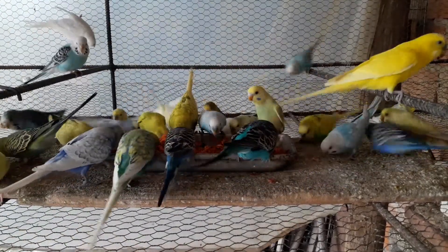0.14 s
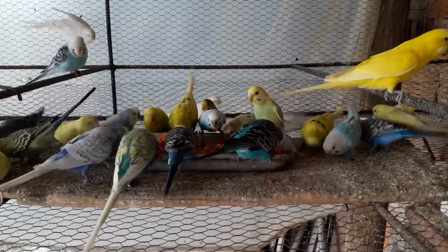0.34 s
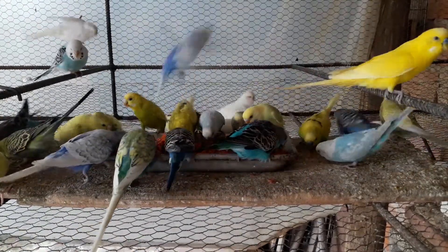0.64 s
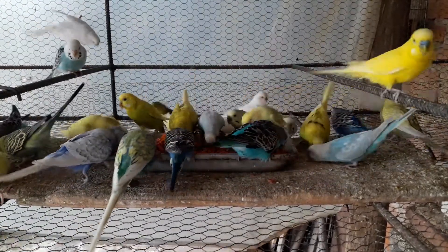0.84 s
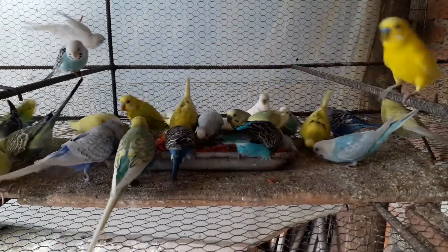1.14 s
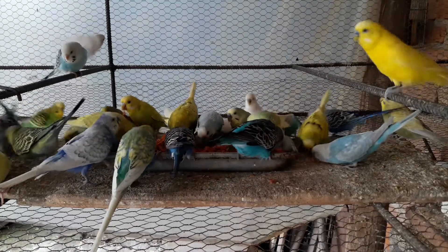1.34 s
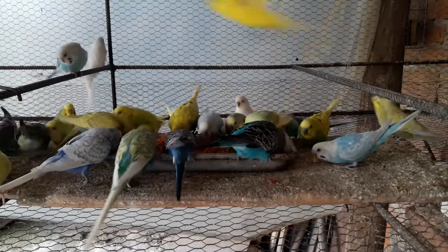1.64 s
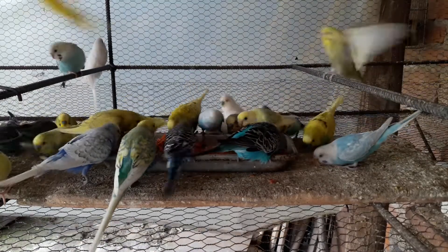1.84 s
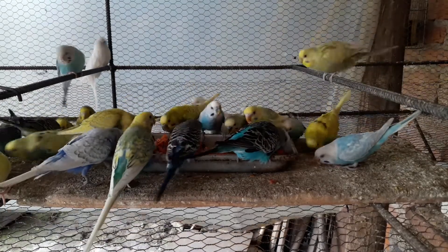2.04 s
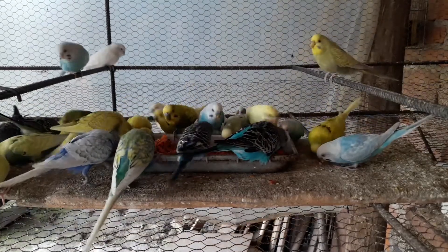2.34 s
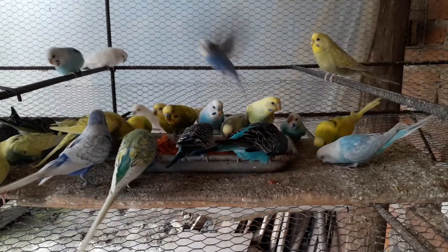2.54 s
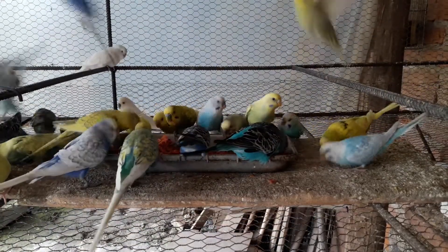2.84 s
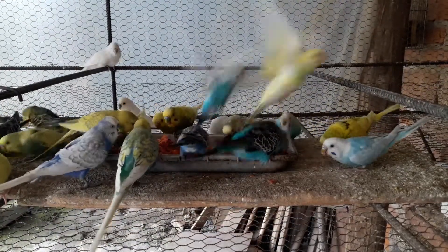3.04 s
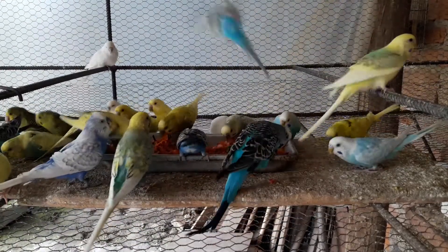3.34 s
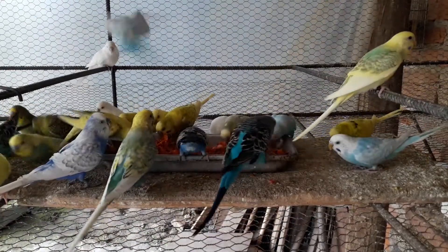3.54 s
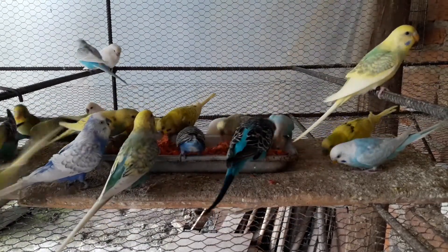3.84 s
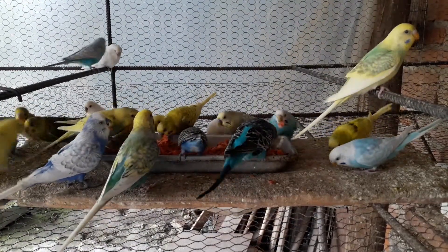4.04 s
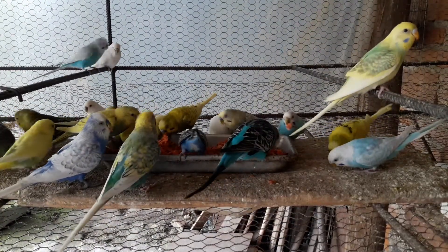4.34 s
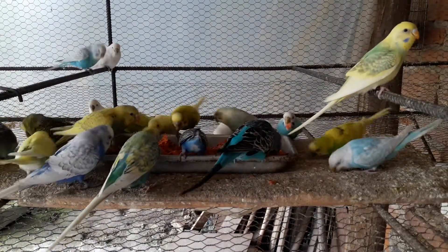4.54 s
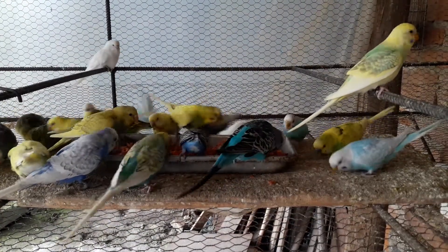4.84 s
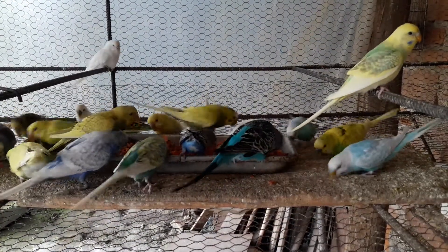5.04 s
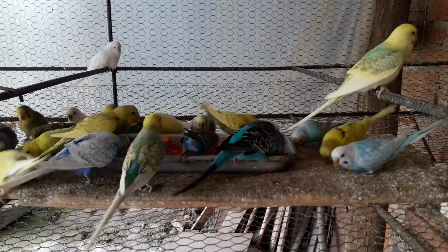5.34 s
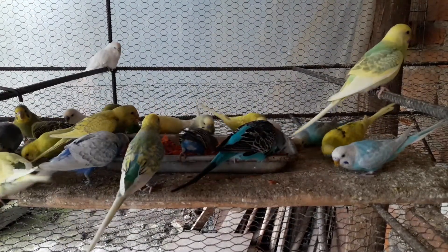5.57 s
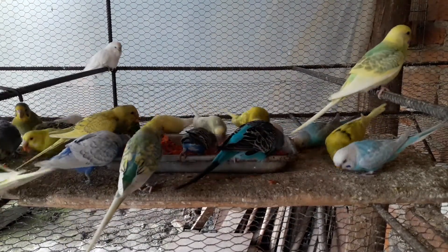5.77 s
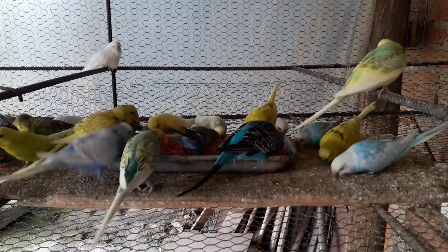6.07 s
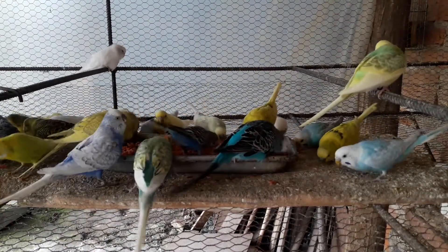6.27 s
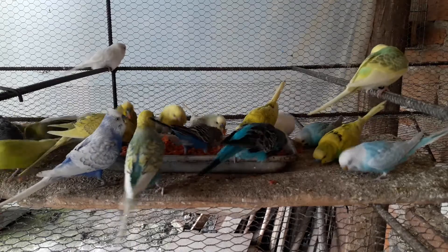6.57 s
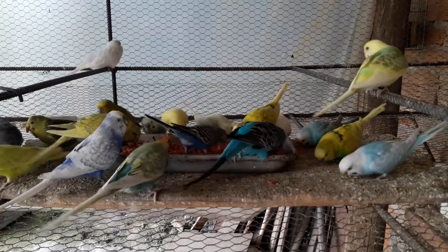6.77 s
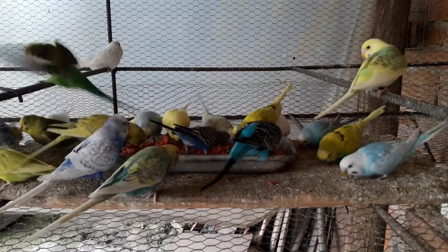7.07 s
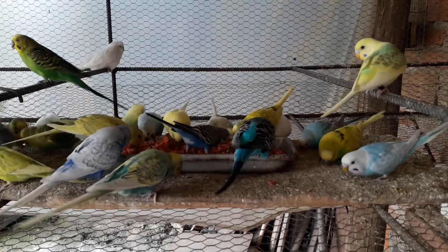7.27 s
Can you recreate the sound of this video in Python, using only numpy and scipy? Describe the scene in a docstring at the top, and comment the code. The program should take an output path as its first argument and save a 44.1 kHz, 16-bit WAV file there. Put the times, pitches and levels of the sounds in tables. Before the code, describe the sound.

A close, lightly echoing aviary with soft outdoor noise and a steady patter of tiny pecking and scratching clicks. A faint flutter opens it; a small chip sounds at 0.4 s, then at 0.6 s a dry snap, a strong wing burst and a raspy rising squawk, another at 0.8. Flapping continues from 1.0 to about 1.7, with rough chirps at 1.5 and 1.8. Low clucks and tiny chips follow from 2.1 to 2.5. At 2.6 to 3.2 s comes a cluster of snaps with loud, rapid flapping, a hard crack at 3.0; a weaker flutter with soft whirs runs 3.6 to 4. A soft peep comes at 3.9, and a faint wavering motor hum near 160 Hz lingers. Clucks dot 4.4 to 5.7, with a light flutter at 4.8 and squeaky falling or dipping chirps at 5.2 and 5.75. Small snaps and a faint far falling note come near 6.6, then a softer chirp and flutter at 7.1.

```python
"""A flock of budgerigars feeds on a ledge in a wire aviary, close to the microphone.
Throughout: outdoor noise, pecking as clicks of noise, and wings as stroke-swelled noise.
From the first second: bouts of flapping, upward chips, dry snaps, and calls of gliding rough harmonics.
Then low clucks; in the second half a far motor's wavering sine hum, one soft peep and a faint far note
that falls; whirring wing strokes as short sines. The ledge and walls add a short echo of noise to the
birds, and a weaker one to pecks and snaps."""
import sys
import numpy as np
from scipy import signal
from scipy.fft import rfft, irfft
from scipy.io import wavfile

SR = 44100
rng = np.random.default_rng(int(sys.argv[2]) if len(sys.argv) > 2 else 0)


def put_to_file(sound):
    """Save the sound as 16-bit audio at rate SR, in the file named by the first command-line argument."""
    columns = np.atleast_2d(sound).T  # one column per channel
    safe = np.clip(columns, -1, 1)
    whole_steps = np.round(safe * 32767)
    wavfile.write(sys.argv[1], SR, whole_steps.astype(np.int16))


N = 326781
TIME = np.arange(N) / SR
TOP_HZ = 16000  # upper limit of harmonics and recorder

# spectrum of feathers sliding over each other, also of pecks: (f/Hz, relative level/dB)
FEATHERS = [(400, 7), (1000, 1.5), (2000, 2), (3000, -8), (4500, -1.5), (7000, -4), (9000, -15),
            (15500, -7)]


def undb(db):
    """Decibels to gain."""
    return 10 ** (np.asarray(db) / 20)


def unit(x):
    """Scale to rms 1."""
    return x / np.sqrt(np.mean(x ** 2) + 1e-18)


def response(points, hz):
    """Gain of an (f/Hz, level/dB) spectrum at the given frequencies, interpolated over log f."""
    f, db = np.transpose(points)
    return undb(np.interp(np.log(np.maximum(hz, 1)), np.log(f), db))


def colour(x, points):
    """Filter by an (f/Hz, level/dB) spectrum; rms 1."""
    gain = response(points, np.fft.rfftfreq(len(x), 1 / SR))
    return unit(irfft(rfft(x) * gain, len(x)))


def wander(n, hz):
    """Random motion of spread 1, mostly slower than hz."""
    size = n + 4096  # longer than needed, so that the ends do not join
    f = np.fft.rfftfreq(size, 1 / SR)
    spectrum = rfft(rng.standard_normal(size)) / (1 + (f / hz) ** 4)
    return unit(irfft(spectrum, size))[:n]


def add(out, s, x):
    """Mix x into out from time s."""
    i = max(int(s * SR), 0)
    out[i:i + len(x)] += x[:max(N - i, 0)]


def outdoors(level_db=-48, swell_db=2.1):
    """Outdoor noise of fixed colour that swells a little."""
    # relative spectrum: (f/Hz, level/dB)
    outdoor_spectrum = [(35, -17), (80, -4), (165, 3), (240, -9), (330, -6.5), (650, -14), (1720, -14),
                        (2900, -28), (5200, -21), (7300, -27), (8700, -37.5), (14000, -33)]
    noise = colour(rng.standard_normal(N), outdoor_spectrum)
    return noise * undb(level_db + swell_db * wander(N, 1))


def pecking(per_s=70, spread_db=6, decay_s=0.0023, db=-55):
    """Many beaks crack seed and claws scratch the ledge: tiny decaying clicks of different sizes."""
    sizes = undb(spread_db * np.minimum(rng.exponential(size=N), 2))
    clicks = sizes * (rng.random(N) < per_s / SR)
    envelope = signal.lfilter([1], [1, -np.exp(-1 / (decay_s * SR))], clicks)
    return undb(db) * colour(envelope * rng.standard_normal(N), FEATHERS)


def flapping(attack_s=0.033, release_s=0.17, fade_db_per_s=3, shuffle_air_db=-68, shuffle_swish_db=-60):
    """Gains of air rush and feather swish: bouts add in power over the crowd's shifting wings."""
    # bouts: (t at full strength/s, length/s, air rush level/dB, feather swish level/dB)
    flights = [(0.117, 0.35, -54.5, -62), (0.598, 0.32, -38, -42), (1.012, 0.62, -44, -47),
               (2.444, 0.13, -73, -49), (2.796, 0.29, -38.5, -40), (3.108, 0.14, -39, -39),
               (3.587, 0.38, -49.5, -45.5), (4.203, 0.15, -64, -51), (4.76, 0.21, -53.5, -54.5),
               (7.112, 0.28, -55.5, -51.5)]
    air_power, swish_power = undb(shuffle_air_db) ** 2, undb(shuffle_swish_db) ** 2
    for s, length, air_db, swish_db in flights:
        age = np.maximum(TIME - s, 0)
        attack = np.clip(1 + (TIME - s) / attack_s, 0, 1)
        fade = undb(-fade_db_per_s * age)  # the bird moves off
        release = np.exp(-np.maximum(age - length, 0) / release_s)
        effort = attack * fade * release
        air_power = air_power + (effort * undb(air_db)) ** 2
        swish_power = swish_power + (effort * undb(swish_db)) ** 2
    return np.sqrt(air_power), np.sqrt(swish_power)


def wingbeats(beat_hz, unevenness=.1):
    """The push of one bird's wings: a swell for every stroke, never quite regular."""
    phase = 2 * np.pi * np.cumsum(beat_hz * (1 + unevenness * wander(N, 10.3))) / SR
    return unit(np.exp(np.cos(phase)) * undb(2 * wander(N, 4.7)))


def wings(crackle_db=2.0):
    """Overlapping birds beat the air; their feathers swish and crackle with each stroke."""
    # relative spectrum of the air a wing pushes: (f/Hz, level/dB)
    air_spectrum = [(35, -28), (80, -1.5), (170, -3.5), (290, -17), (400, -1.5), (510, 2), (720, -7.5),
                    (3000, -25.5)]
    air_gain, swish_gain = flapping()
    beats = unit(np.hypot(wingbeats(15) / 2, wingbeats(26.6)))
    air = colour(np.sqrt(beats) * rng.standard_normal(N), air_spectrum)
    barbs = undb(crackle_db * wander(N, 480)) * rng.standard_normal(N)
    swish = colour(beats * barbs, FEATHERS)
    return air * air_gain + swish * swish_gain


def syrinx(hz, rough, throat, overtone_db=0, tilt_db=0, jitter=0.046, jitter_hz=700, wobble=.07,
           shimmer=0.74, rasp=0.34, doubling=1.2, count=12):
    """A vibrating membrane heard through the throat; roughness shakes pitch and strength, adds a rasp."""
    n = len(hz)
    shake = np.sqrt(abs(rough))
    pitch_shake = wobble * shake * wander(n, 178) + jitter * rough * wander(n, jitter_hz)
    phase = 2 * np.pi * np.cumsum(hz * (1 + pitch_shake)) / SR
    k = np.arange(1, count + 1)[:, None]  # harmonic numbers
    # the beak's opening sets the second harmonic; tilt is per octave
    balance = undb(overtone_db * (k == 2) + tilt_db * np.log2(k))
    gains = response(throat, k * hz) * balance * (k * hz < TOP_HZ)
    tone = np.sum(gains * np.sin(k * phase), axis=0)
    # pressed hard, cycles come strong and weak in turn: a strand between the first two harmonics
    strand_gain = doubling * rough * wander(n, 100) * response(throat, hz + hz / 2)
    strand = strand_gain * np.sin(phase + phase / 2)
    strength = 1 + np.tanh(shimmer * shake * wander(n, 250))
    voiced = unit((tone + strand) * strength)
    turbulence = colour(rng.standard_normal(n) * (1 + np.cos(phase)), throat)
    return unit(voiced + rasp * rough * turbulence)


def syllable(length, glide_hz, swell_db, overtone_db, rough, edge_s=.005):
    """One curved glide through a start, middle and end pitch, swelling or fading; rms 1."""
    # what throat and beak let through: (f/Hz, level/dB)
    chirp_throat = [(900, -23), (1900, -3), (3500, 2.5), (5000, 0), (7000, -12.5), (8700, -23.5),
                    (11500, -29.5), (14500, -23.5)]
    u = np.linspace(0, 1, int((length + edge_s) * SR))
    hz = np.polyval(np.polyfit([0, .5, 1], glide_hz, 2), u)
    edges = np.clip(np.minimum(u, 1 - u) * length / edge_s, 0, 1)
    pressure = edges * undb(swell_db * u)
    return unit(pressure * syrinx(hz, rough, chirp_throat, overtone_db))


def chips(lead_s=.0025, swell_db=-11, overtone_db=-4.5, rough=.25):
    """A single syllable that flicks upward and fades."""
    # (t/s, length/s, top f/Hz, level/dB); each starts lead_s before t
    chip_notes = [(0.404, 0.018, 2450, -37), (.567, .023, 2583, -32), (2.158, .012, 2425, -37),
                  (2.528, 0.09, 2625, -46.5)]
    out = np.zeros(N)
    for s, length, top_hz, db in chip_notes:
        glide_hz = top_hz * np.array([.66, .92, 1])
        voice = syllable(length, glide_hz, swell_db, overtone_db, rough)
        add(out, s - lead_s, undb(db) * voice)
    return out


def ring(x, hz, q):
    """One resonance."""
    return signal.lfilter(*signal.iirpeak(min(hz, SR / 2 - 1000), max(q, 1), fs=SR), x)


def snaps(decay_s=0.0049, rise_s=0.00033, crack=0.97, boost_db=4.5):
    """Wing tips, claws and beaks snap: a dry crack of noise with one short resonance."""
    # (t/s, level before boost/dB, ring f/Hz)
    snap_events = [(0.57, -24, 5030), (2.582, -37, 2100), (2.729, -34.5, 1490), (2.756, -34.5, 1300),
                   (2.792, -33.5, 1610), (3.016, -20.5, 5130), (3.113, -24, 1770), (4.873, -41, 7000),
                   (5.464, -34.5, 4830), (6.567, -45.5, 3520), (6.620, -36.5, 6100), (6.892, -45.5, 7000)]
    out, t = np.zeros(N), np.arange(SR // 20) / SR
    envelope = (1 - np.exp(-t / rise_s)) * np.exp(-t / decay_s)
    for s, db, hz in snap_events:
        body = unit(ring(rng.standard_normal(len(t)), hz, q=3.9))
        burst = unit(body + crack * rng.standard_normal(len(t)))
        add(out, s, undb(db + boost_db) * burst * envelope)
    return out


def chirps(lead_s=.0025, attack_s=.008):
    """Calls join an opening to an ending, stretched and transposed; pitch jumps between syllables."""
    # syllables by shape, before stretch and transposition:
    # (length/s, start f/Hz, middle f/Hz, end f/Hz, level/dB, swell/dB, overtone/dB, roughness 0-1)
    openings = {"climb": [(.024, 2843, 3335, 3640, -3.5, 0, 8, 0.15),
                (.044, 1884, 2902, 3620, 0, 11.5, -2.5, 0.18)],
                "dip": [(.041, 4150, 3550, 3150, -9.5, 4, 3, 0.2),
                (.014, 2300, 2700, 2910, -8.5, -5, -13, 0.47), (.019, 3550, 3680, 3760, 0.5, 6.5, 2, .1)],
                "plunge": [(.048, 4300, 3230, 2980, -3, 15, 4, 0.08),
                (.027, 2083, 1737, 1895, 0, 0, 13, .92)]}
    endings = {"rasp": [(.035, 1700, 1930, 2230, 0, 4, 0.5, .38),
               (.026, 2050, 2280, 2330, 0, -1, -0.5, .48), (.012, 2850, 2400, 2000, 0, -4, -3, 0.74)],
               "whistle": [(.031, 1760, 2100, 2600, -8.5, -4, -16, 0.54),
               (.029, 2620, 2850, 2760, .5, 10, -11, 0.11), (.015, 2750, 2200, 1920, -5.5, -7, -4.5, .78)],
               "fall": [(.038, 4050, 3610, 2700, 0, -12.5, 0, .28),
               (.019, 3440, 3310, 2380, -5.5, -1, -6, 0.73)]}
    # calls: (t/s, length/s, opening, ending); a half is (shape, pitch factor, level/dB, extra overtone/dB)
    squawks = [(.603, 0.14, ("climb", 0.99, -16, 1), ("rasp", .93, -12.3, 3.8)),
               (.791, 0.14, ("climb", 0.98, -16, 3), ("rasp", 1.11, -20, -4.5)),
               (1.494, 0.14, ("climb", 1.075, -14.5, -9), ("rasp", 1.08, -21, 0.88)),
               (1.791, .15, ("dip", 0.98, -19.5, 0), ("whistle", 0.98, -25, -1.7)),
               (5.188, 0.13, ("plunge", 1.0, -17.5, 0), ("fall", 1.0, -14.3, 0)),
               (5.752, .143, ("dip", 1.016, -21.5, 1), ("whistle", 1.0, -21.5, 2.5)),
               (7.173, 0.18, ("dip", .9, -27, 0.9), ("whistle", .82, -25.5, 5.3))]
    out = np.zeros(N)
    shapes = openings | endings
    for s, call_s, *halves in squawks:
        stretch = call_s / sum(row[0] for half in halves for row in shapes[half[0]])
        age = 0
        for shape, pitch, half_db, extra_db in halves:
            for length, *glide_hz, db, swell_db, overtone_db, rough in shapes[shape]:
                glide = pitch * np.array(glide_hz)
                voice = syllable(length * stretch, glide, swell_db, overtone_db + extra_db, rough)
                attack = np.minimum((age + TIME[:len(voice)]) / attack_s, 1)
                add(out, s + age - lead_s, undb(half_db + db) * attack * voice)
                age += length * stretch
    return out


def clucks(opening_db=6, even_db=-32, tilt_per_db=0.57, rough=0.49):
    """Brief low notes that start dull and gain overtones, swelling and closing; louder ones are brighter."""
    # (t/s, length/s, start f/Hz, end f/Hz, level/dB)
    cluck_notes = [(2.119, .034, 1497, 1265, -26), (2.276, 0.011, 2230, 2190, -34.5),
                   (2.331, 0.0088, 1195, 1270, -37.5), (2.38, 0.0074, 1670, 1600, -40.5),
                   (2.501, 0.0087, 2110, 2120, -35.5), (3.896, 0.022, 947, 890, -37.5),
                   (4.44, 0.018, 923, 867, -33.5), (4.912, 0.027, 1083, 1191, -25.5),
                   (4.989, .025, 995, 1250, -28.5), (5.432, 0.017, 1180, 1298, -38),
                   (5.536, 0.022, 1050, 1343, -26.5), (5.607, .013, 1156, 1157, -38),
                   (5.712, .022, 940, 998, -35.5), (7.08, 0.014, 2100, 1600, -44.5)]
    # what throat and beak let through: (f/Hz, level/dB)
    cluck_throat = [(600, -10), (1200, 1.5), (3600, 1), (6500, 0.5), (9000, -17)]
    out = np.zeros(N)
    for s, length, start, end, db in cluck_notes:
        u = np.linspace(0, 1, int(length * SR))
        hz = end + (start - end) * (1 - u) ** 2
        pressure = np.sin(np.pi * u)
        # dB per octave; loudness adds none at even_db
        tilt_db = tilt_per_db * (db - even_db) - opening_db * (1 - u) ** 2
        voice = syrinx(hz, rough, cluck_throat, tilt_db=tilt_db)
        add(out, s, undb(db) * unit(pressure * voice))
    return out


def whirs(width_s=0.008):
    """A braking wing makes its flight feathers whir for a moment: a short wavering sine."""
    # (t of peak/s, f/Hz, level/dB)
    strokes = [(3.622, 553, -37), (3.742, 490, -34), (3.80, 510, -38.5), (6.85, 563, -44.5)]
    out, t = np.zeros(N), np.arange(-SR // 20, SR // 20) / SR
    for s, hz, db in strokes:
        whir = np.sin(2 * np.pi * hz * t + .5 * wander(len(t), 145))
        add(out, s + t[0], undb(db) * unit(whir) * np.exp(-(t / width_s) ** 2))
    return out


def motor(top_hz=163.6, sag_hz_per_s=2.1, approach_db_per_s=11, trim_db=-1):
    """Wavering sine of a far motor: inaudible at first, it draws near, then slowly loses speed."""
    # hum level before trim: (t/s, level/dB); the first row ends the approach
    motor_level = [(3.4, -51), (3.57, -58), (3.89, -38.5), (4.02, -57), (4.43, -40.5), (4.92, -62),
                   (4.95, -49.5), (5.8, -43.5), (7.41, -55)]
    s, db = np.transpose(motor_level)
    hz = top_hz - sag_hz_per_s * abs(TIME - s[0])
    approach_db = approach_db_per_s * np.maximum(s[0] - TIME, 0)
    hum_db = np.interp(TIME, s, db) + trim_db - approach_db
    phase = 2 * np.pi * np.cumsum(hz * (1 + .016 * wander(N, 32))) / SR
    return unit(np.sin(phase)) * undb(hum_db + 0.69 * wander(N, 5.3))


def peep(s=3.873, width_s=0.008, hz=1390, db=-33):
    """One soft, nearly pure peep among the chatter."""
    phase = 2 * np.pi * hz * TIME + .5 * wander(N, 100)
    return undb(db) * unit(np.sin(phase)) * np.exp(-((TIME - s) / width_s) ** 2)


def far_note(s=6.68, width_s=0.18, hz=615, fall_hz_per_s=300, db=-53):
    """A faint, wavering note falls somewhere far off."""
    phase = 2 * np.pi * np.cumsum(hz - fall_hz_per_s * (TIME - s)) / SR
    return undb(db) * unit(np.sin(phase + wander(N, 33))) * np.exp(-((TIME - s) / width_s) ** 2)


def beam(x, hz=10000):
    """The treble leaves the beak in a narrow beam, so it fades when a bird turns away."""
    # how squarely the calling bird faces the microphone: (t/s, treble level/dB)
    facing = [(.72, 5.5), (1.5, -11), (5.25, 3), (7.2, -5)]
    top = signal.sosfiltfilt(signal.butter(3, min(hz, TOP_HZ), "high", fs=SR, output="sos"), x)
    return x + top * (undb(np.interp(TIME, *np.transpose(facing))) - 1)


def aviary(x, ledge_s=0.005, gap_s=0.0045, t60_s=0.25, room_db=-11.5, ledge_db=-4.5):
    """Close reflections off the ledge and tray, then a short tail from the walls."""
    t = np.arange(SR // 2) / SR
    near = unit(rng.standard_normal(len(t)) * t * np.exp(-t / ledge_s))
    decay = np.exp(-np.log(1000) * t / t60_s)
    tail = unit(rng.standard_normal(len(t)) * (t > gap_s) * decay)
    echoes = (undb(ledge_db) * near + undb(room_db) * tail) / np.sqrt(len(t))
    return x + signal.fftconvolve(x, echoes)[:N]


def scene():
    """The flock in its aviary, over the background; snaps and pecks get half the echo."""
    close = snaps() + pecking()
    voices = beam(chirps() + chips() + clucks())
    flock = voices + peep() + wings() + whirs()
    background = motor() + outdoors()
    return (aviary(flock + close / 2) + close / 2 + far_note() + background)[None]


def record(dry):
    """The recorder holds the peaks at full scale and cuts the deep bass and the top."""
    held = np.clip(dry, -1, 1)
    thinned = signal.sosfilt(signal.butter(3, 52, "high", fs=SR, output="sos"), held)
    return signal.sosfilt(signal.ellip(8, .2, 70, TOP_HZ, fs=SR, output="sos"), thinned)


dry = scene()
out = record(dry)
put_to_file(out)
```